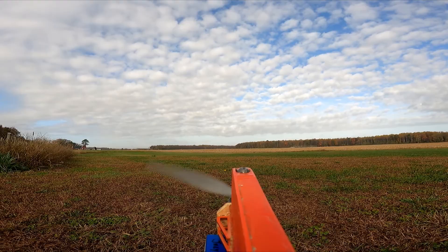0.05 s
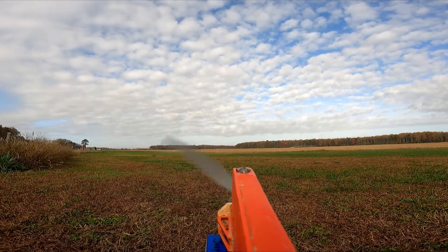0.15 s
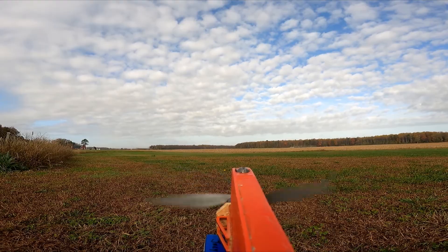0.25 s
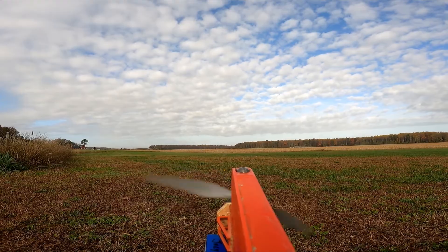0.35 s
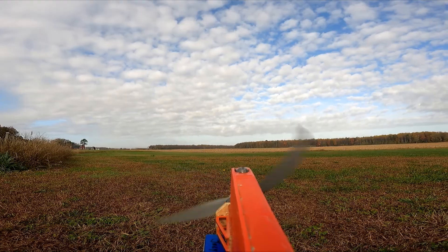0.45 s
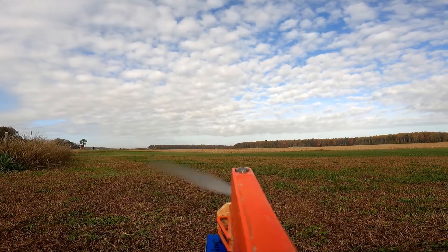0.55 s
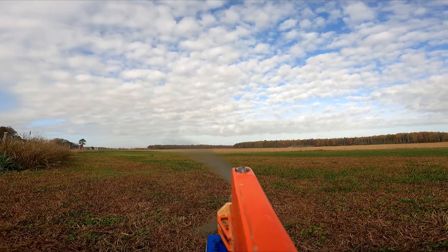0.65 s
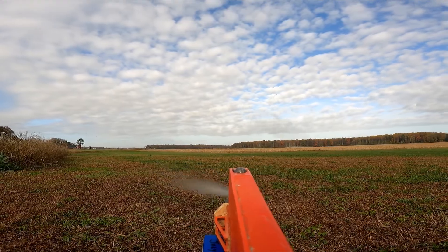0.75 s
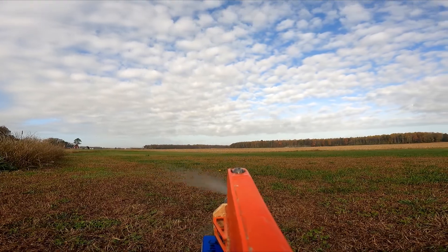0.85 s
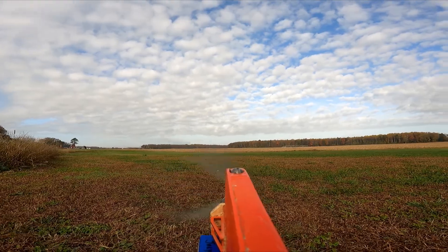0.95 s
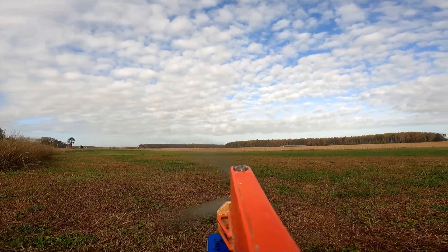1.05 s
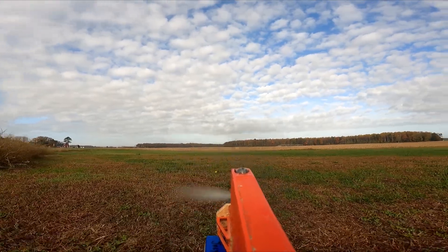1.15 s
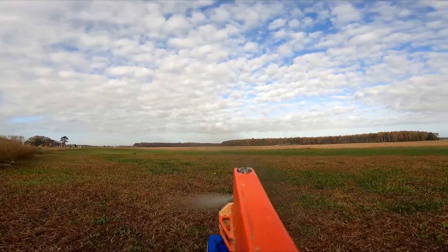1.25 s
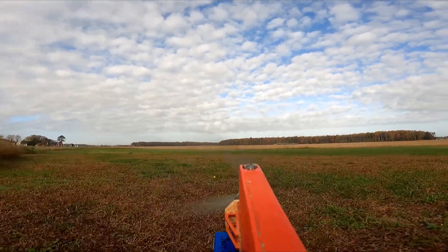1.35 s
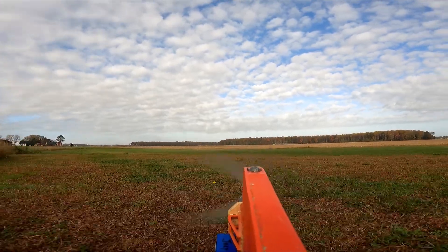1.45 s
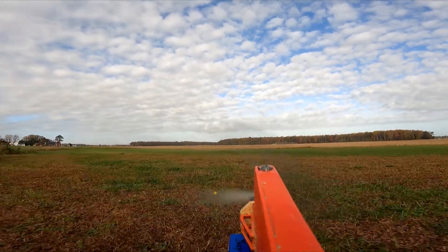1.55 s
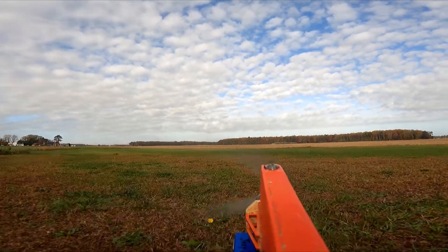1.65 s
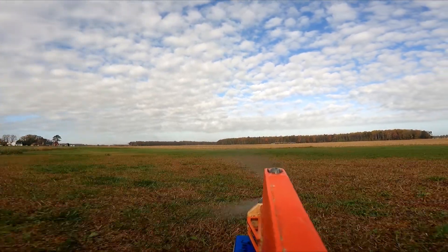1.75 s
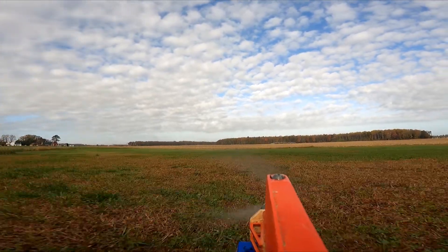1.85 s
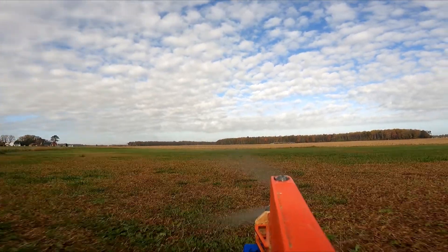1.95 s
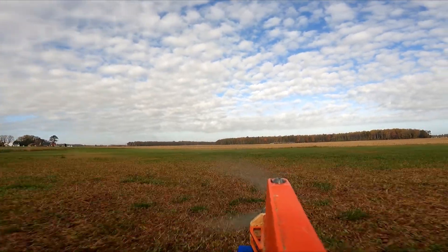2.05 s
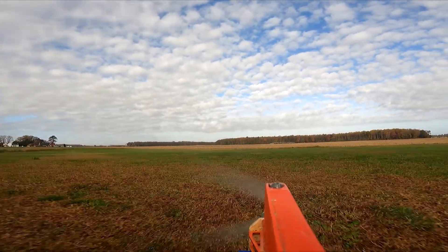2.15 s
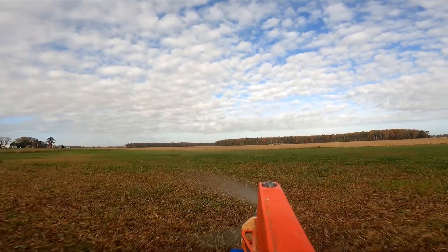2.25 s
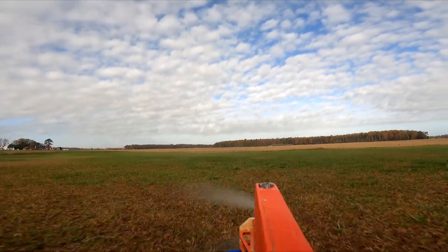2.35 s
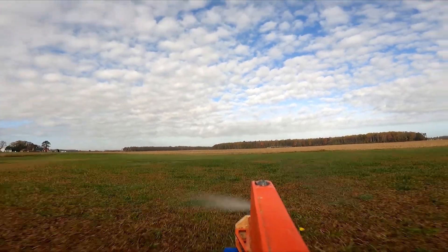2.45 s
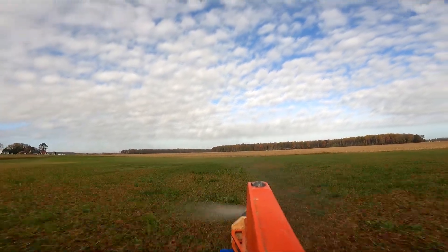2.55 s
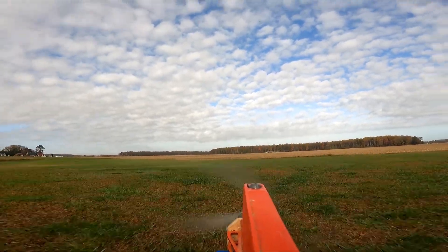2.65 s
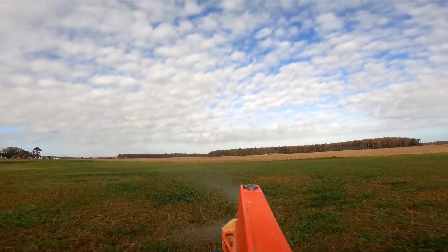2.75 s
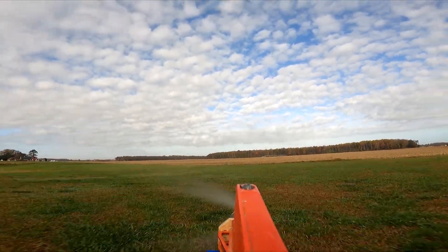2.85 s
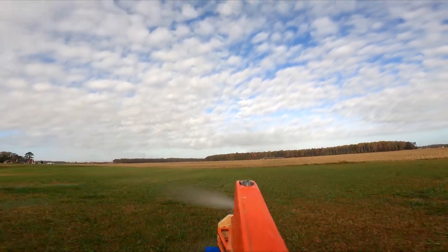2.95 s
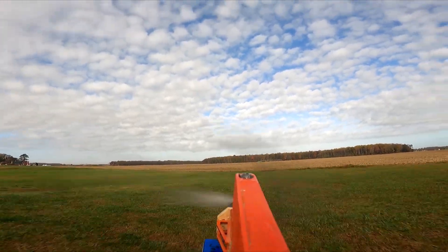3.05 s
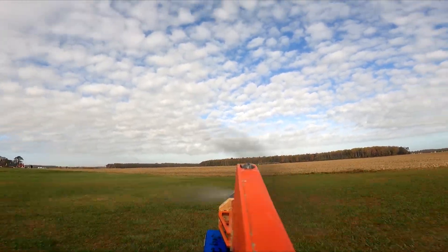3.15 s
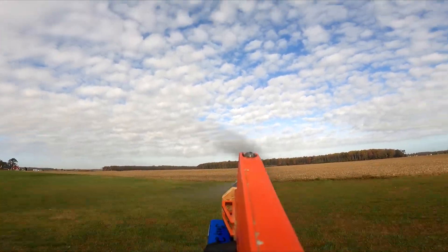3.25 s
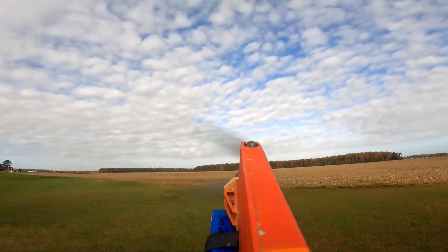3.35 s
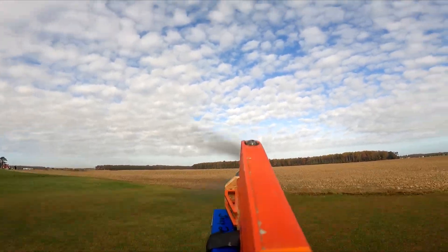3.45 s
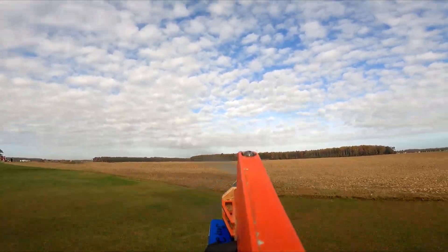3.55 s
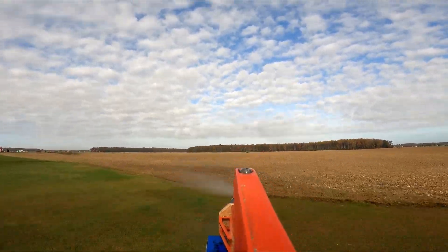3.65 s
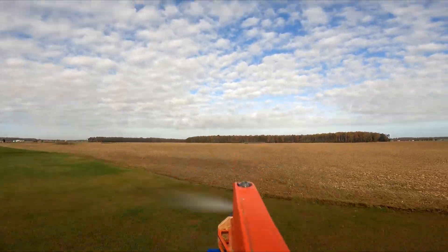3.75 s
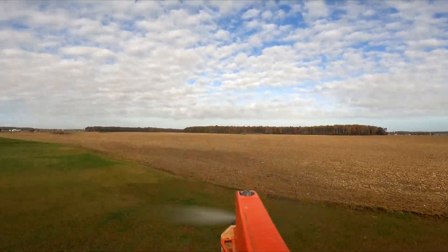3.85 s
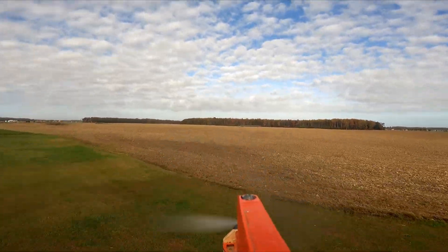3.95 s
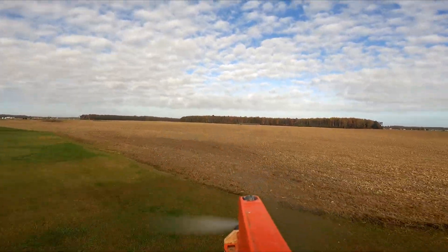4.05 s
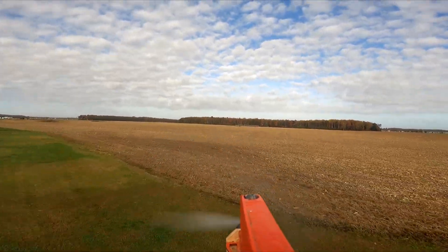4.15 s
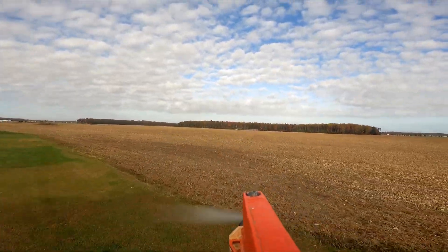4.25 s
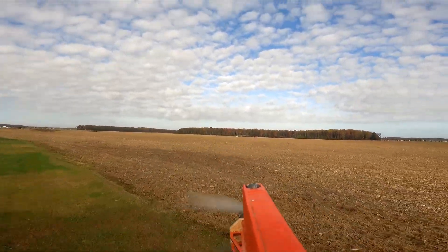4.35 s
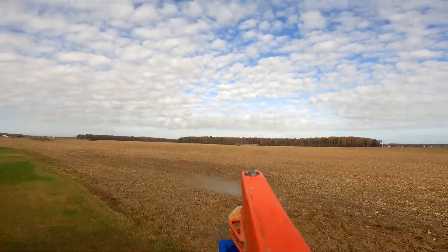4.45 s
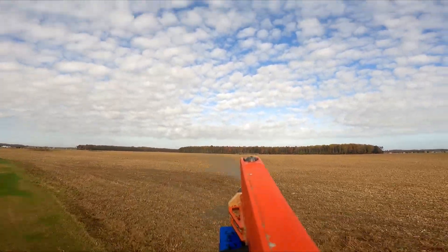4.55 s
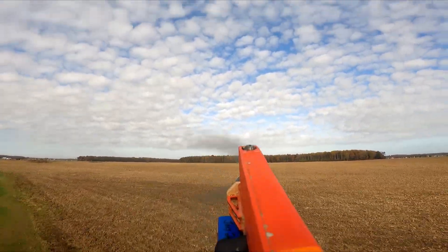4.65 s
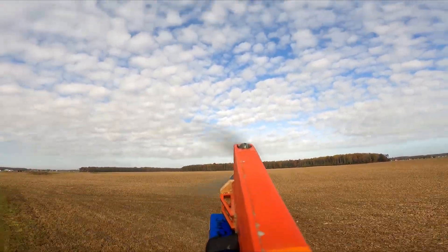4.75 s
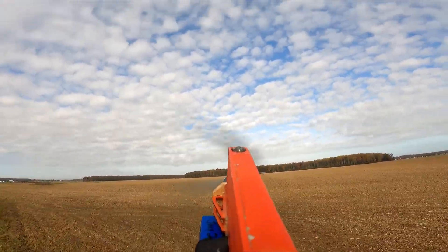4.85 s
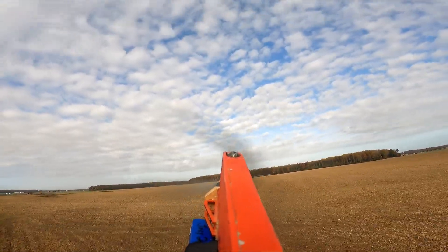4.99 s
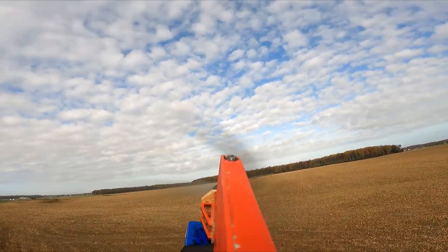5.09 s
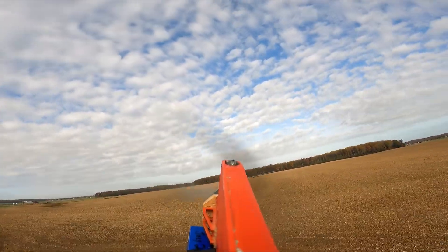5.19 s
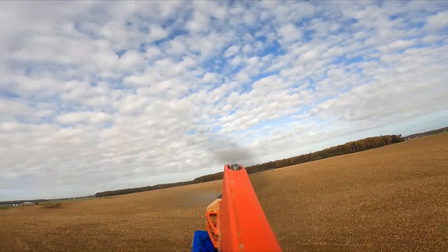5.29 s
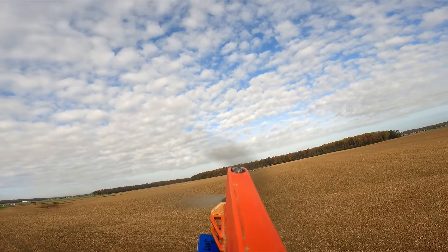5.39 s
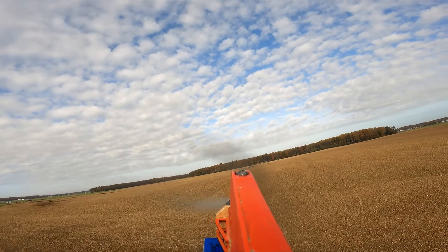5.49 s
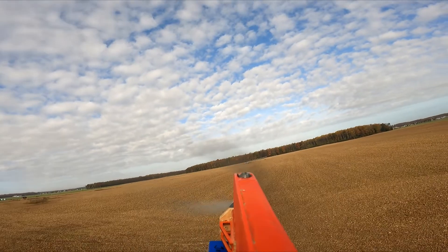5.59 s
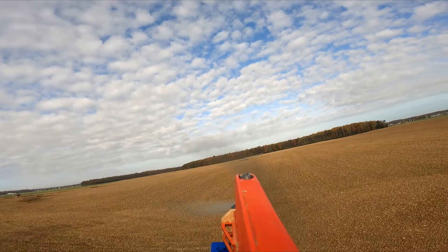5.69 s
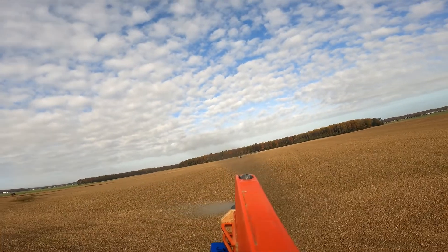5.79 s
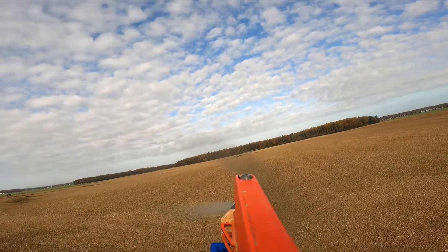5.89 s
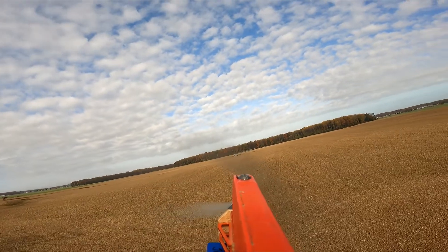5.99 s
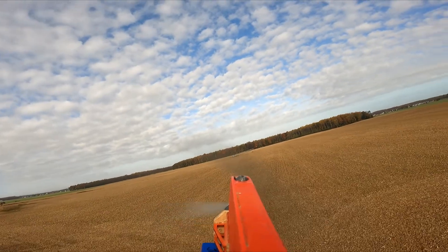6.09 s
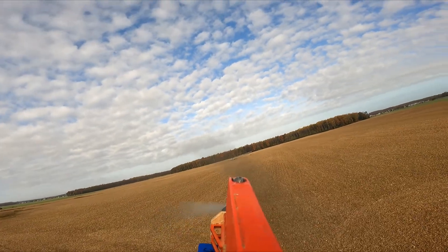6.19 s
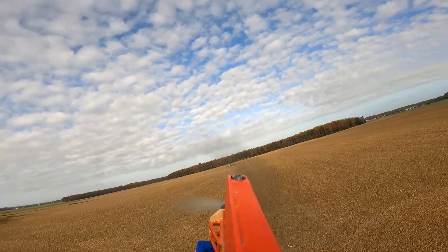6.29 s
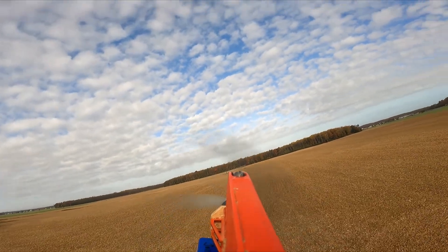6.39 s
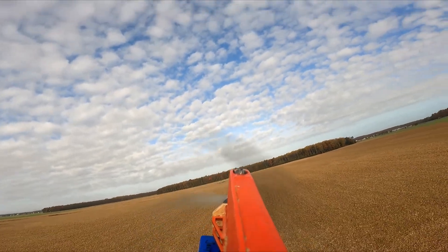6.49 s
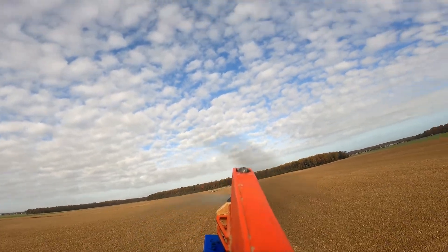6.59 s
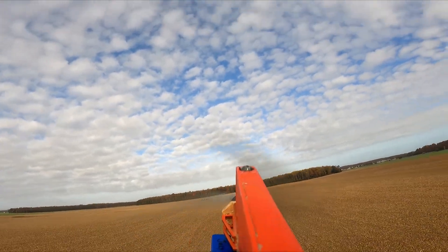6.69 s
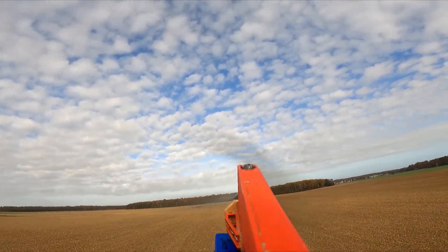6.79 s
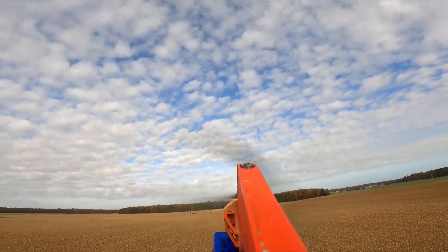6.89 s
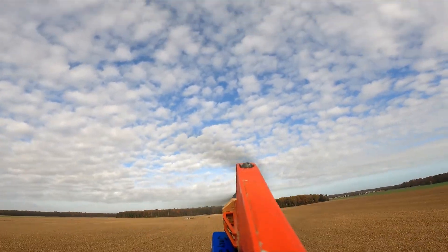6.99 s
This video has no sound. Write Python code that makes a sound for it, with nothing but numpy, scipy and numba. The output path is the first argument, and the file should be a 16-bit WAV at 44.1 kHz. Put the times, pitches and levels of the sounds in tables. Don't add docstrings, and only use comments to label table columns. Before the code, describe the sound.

From a camera fixed to a small electric model plane over an open field: a freewheeling motor slows with a soft hollow whir, then power kicks in at about half a second with a rasping, rising whine. A heavy blast of propeller air crackles on the microphone, then settles into steady buffeting and hiss, with a deep wavering propeller drone that grows and holds at full speed to the end.

```python
import sys
import numpy as np
from scipy import signal
from scipy.fft import rfft, irfft, next_fast_len
from scipy.io import wavfile
from numba import njit

SR = 44100
rng = np.random.default_rng(int(sys.argv[2]) if len(sys.argv) > 2 else 0)


def nominal_scale(level):
    x = np.asarray(level, float) / 20
    return 10 ** x


def unload_wav(signal):
    wavfile.write(
        sys.argv[1],
        SR,
        np.round(np.clip(np.atleast_2d(signal).T, -1, 1) * 32767).astype(np.int16),
    )


N = 310023
T = np.arange(N) / SR
POWER_ON_S, SURGE_S, LIFT_OFF_S = .6, .88, 1.7
FULL_SPEED_HZ = 135


def curves(table):
    s, *columns = np.transpose(table)
    return [np.interp(T, s, c) for c in columns]


def bell(s, length):
    return np.exp(-((T - s) / length) ** 2)


def ramp(s, length):
    return np.clip((T - s) / length, 0, 1)


def shaped(gain):
    size = next_fast_len(N)
    hz = np.arange(size // 2 + 1) * SR / size + 1e-3
    x = irfft(rfft(rng.standard_normal(size)) * gain(hz), size)[:N]
    return x / x.std()


def band(hz, width):
    return shaped(lambda f: np.exp(-.5 * ((f - hz) / width) ** 2))


def walk(rate):
    return shaped(lambda f: 1 / (1 + (f / rate) ** 2))


def resonant(modes):
    def gain(f):
        return np.sqrt(sum(nominal_scale(2 * db) / (1 + (2 * (f - hz) / w) ** 4) for hz, w, db in modes))
    return shaped(gain)


def tone(turns, order, db):
    return np.sqrt(2) * nominal_scale(db) * np.sin(2 * np.pi * order * turns)


# time in seconds, shaft speed in Hz.
SHAFT_SPEED = [(0, 38.3), (.3, 29.5), (.51, 24), (.6, 23.1), (.63, 24.5), (.68, 39), (.71, 49), (.8, 85.5),
               (.835, 96.5), (.88, 104), (1.0, 114), (1.3, 123), (1.6, 125.5), (1.69, 133.6), (2.1, 134.7),
               (3.5, 134.2), (4.3, 135.2), (7.03, 134.9)]


def shaft_speed():
    return curves(SHAFT_SPEED)[0]


# time in seconds, side against mid in dB at 1 kHz, tilt in dB an octave.
STEREO_WIDTH = [
    (0, -6, -0.5),
    (.5, -30.5, 1),
    (1.1, -44, 6.5),
    (1.7, -37.5, 5.5),
    (2.1, -55, 8),
]


def width():
    side_db, tilt_db = curves(STEREO_WIDTH)
    slips_db = sum(12 * bell(s, length=.03) for s in (.8, 1.03, 2.85, 6.35))
    return side_db + slips_db, tilt_db


# time in seconds, gust strength in dB.
GUST_STRENGTH = [(1.0, -30), (1.03, -37), (1.07, -27.5), (1.08, -45.5), (1.74, -50.5), (2.81, -41.5),
                 (2.86, -33), (2.91, -39.5), (3.7, -42.5), (3.74, -56.5), (4.06, -54.5), (4.43, -39),
                 (4.61, -43.5), (5.05, -39.5), (5.72, -48), (6.59, -35), (6.61, -40), (7.03, -42.5)]


def gusts():
    usual_db = -42
    return curves(GUST_STRENGTH)[0] - usual_db


# centre in Hz, steady level in dB,
# then dB per dB of shaft speed, per dB of gust, per dB of airstream.
WASH_LAYERS = [
    (71, -28, -0.05, 0.48, .05),
    (280.8, -24, 1.28, 0.075, 0.34),
    (1600, -19, 0.35, 0.8, .05),
    (7300, -19, 0.47, 0.083, 0.9),
]
# level in dB, rise in seconds, fall in seconds.
THRUST_SURGE = [
    (9.5, 0.059, 1.6),
    (12.5, 0.086, 0.54),
    (2.5, 0.14, 0.35),
    (4, 0.12, 0.18),
]
# time in seconds, level in dB.
AIRSTREAM = [(.2, 2.5), (.45, -8), (.6, 3.5), (.98, 4.5), (1.03, -3), (1.6, -1.5), (2.5, 3), (2.7, -2.5),
             (3.65, -2.5), (3.75, 5.5), (4.4, 3), (4.7, -3.5), (5.3, 3), (5.5, 4), (6.3, 1), (6.6, -1),
             (7.03, 0.5)]


def wash_levels(speed):
    since = T - SURGE_S
    gust_db = gusts() * np.clip(speed / FULL_SPEED_HZ, 0, 1)
    speed_db = 20 * np.log10(speed / FULL_SPEED_HZ)
    stream_db = curves(AIRSTREAM)[0]
    levels = []
    for layer, (surge_db, rise, fall) in zip(WASH_LAYERS, THRUST_SURGE):
        _, db, per_speed, per_gust, per_stream = layer
        steady_db = db + per_speed * speed_db + per_gust * gust_db + per_stream * stream_db
        levels.append(steady_db + surge_db * np.exp(-np.maximum(-since / rise, since / fall)))
    return np.array(levels)


# frequency in Hz, density in dB per Hz.
PORT_COLOUR = [(22, -3.5), (35, -5), (60, 3), (200, 0.5), (330, -3.5), (500, -10), (900, -22),
               (1500, -32.5), (4600, -46.5), (5600, -50.5), (6200, -58), (8000, -59.5), (9600, -58.5),
               (14800, -85.5)]


def wash(levels):
    colour_hz, colour_db = np.transpose(PORT_COLOUR)
    layer_hz = np.transpose(WASH_LAYERS)[0]
    width_db, tilt_db = width()
    spit = walk(78) * (1 + 0.9 * bell(SURGE_S + .05, .17))
    near, mid, side = walk(14), 0, 0

    def density(f):
        return np.interp(np.log(f), np.log(colour_hz), colour_db)

    for hz in 22 * 2 ** np.arange(0, 10, .5):
        def gain(f):
            crossfade = np.cos(np.pi * np.clip(np.log2(f / hz), -.5, .5))
            return nominal_scale(density(f) - density(hz)) * crossfade

        share = np.array([np.interp(np.log(hz), np.log(layer_hz), row) for row in np.eye(4)])
        near = 0.56 * near + 0.87 * walk(8)
        bursts = np.interp(np.log(hz), np.log([200, 600, 2500, 8000]), [0.14, 0.34, 0.64, 0.36])
        db = share @ levels + density(hz) + 10 * np.log10(hz / 200)
        db = db + bursts * (2.2 * spit + 3.0 * near)
        side_db = db + width_db + tilt_db * np.log2(hz / 1000) + 2 * near
        mid = mid + nominal_scale(db) * shaped(gain)
        side = side + nominal_scale(side_db) * shaped(gain)
    return mid, side


# start in seconds, peak in dB, treble against peak in dB.
AIR_PUFFS = [(0.579, -17.5, -34), (0.6718, -11.5, -35), (0.76, -10.5, -26), (.812, -16, -30),
             (0.944, -18, -28), (0.9837, -11, -23), (1.0152, -24, -44), (1.0626, -24, -33),
             (1.15, -18, -29), (1.3415, -20.5, -25), (2.735, -15.5, -35), (2.803, -18.5, -31),
             (2.845, -17, -31), (3.6257, -14, -37), (4.2666, -21, -30), (4.2997, -32, -10),
             (4.68, -21, -30), (5.3528, -48, -10), (5.4396, -15.5, -42), (6.2077, -14, -28),
             (6.573, -13.5, -32)]
# start in seconds, peak in dB.
AIR_SPITS = [(1.2345, -51), (1.3492, -57), (1.4096, -52), (2.311, -50), (2.4108, -45.5), (2.5034, -44),
             (2.8209, -46.5), (3.2209, -48), (3.2773, -44.5), (3.7088, -49.5), (3.824, -45.5),
             (4.2496, -43), (4.385, -46), (5.1228, -40), (5.2014, -50), (5.3571, -40), (5.586, -45),
             (5.9822, -43), (6.072, -42), (6.1233, -45), (6.193, -41), (6.4416, -46.5), (6.727, -47),
             (6.954, -44.5)]


def puffs():
    body, top = np.zeros(N), np.zeros(N)
    for s, db, treble_db in AIR_PUFFS:
        body[int(s * SR)] = nominal_scale(db - 9.0)
        top[int(s * SR)] = nominal_scale(db + treble_db - 4.5)
    for s, db in AIR_SPITS:
        top[int(s * SR)] = nominal_scale(db - 4.5)
    tail = np.arange(2000) / SR
    envelope = np.exp(-tail / 0.0063) * (1 - np.exp(-tail / 0.0016))
    body = signal.fftconvolve(body, envelope)[:N]
    top = signal.fftconvolve(top, envelope)[:N]
    thump = shaped(lambda f: f / (900 + f) / (1 + (f / 1800) ** 2.8) / (1 + (f / 6000) ** 8))
    return body * thump + top * band(hz=7000, width=2200)


# time in seconds, length in seconds, resonance in Hz, level in dB.
SLAP = (1.2, .1, 3900, -62)


def tip_slap(turns):
    when, length, resonance_hz, db = SLAP
    speed_hz = np.interp(when, *np.transpose(SHAFT_SPEED))
    clicks = 0
    for order in range(22, 42, 2):
        detune = (order * speed_hz - resonance_hz) / 700
        clicks = clicks + tone(turns, order, db=db - 6 * detune ** 2 + 3 * walk(15))
    return bell(when, length) * clicks


# frequency in Hz, width in Hz, level in dB.
COGGING_MODES = [(590, 66, -2), (1020, 150, -4.5), (1610, 160, -10)]


def cogging():
    return resonant(COGGING_MODES) * nominal_scale(-40 + 2.5 * walk(30)) * (1 - ramp(POWER_ON_S, .08))


# time
# in seconds, buzz level in dB.
BUZZ_LEVEL = [(0, -41), (.3, -45.5), (.58, -43), (.635, -35.5), (.745, -30.5), (.86, -40.5),
              (1.05, -45), (1.35, -46.5), (2.2, -71.5)]
# frequency in Hz, level in dB.
LOW_ORDER_PATH = [(305, -22), (350, -31), (550, -12), (690, -22), (830, -35), (1110, -31), (1350, -54),
                  (1750, -42)]
HIGH_ORDER_PATH = [(1000, -50), (1500, -36), (2200, -37), (2700, -26), (3300, -27), (4050, -36),
                   (4300, -66), (5280, -45)]


def motor_levels(speed):
    def path(table, order):
        hz, db = np.transpose(table)
        return np.interp(np.log(order * speed), np.log(hz), db)

    buzz_level_db = curves(BUZZ_LEVEL)[0]
    coasting_db = -16 * (1 - ramp(POWER_ON_S, .03))
    eased_db = -8 * ramp(LIFT_OFF_S, .6)
    low_db = path(LOW_ORDER_PATH, order=13) + .5 * (buzz_level_db + 32.5)
    high_db = path(HIGH_ORDER_PATH, order=42) + .35 * (buzz_level_db + 37) + coasting_db
    return low_db + eased_db / 2, high_db + eased_db, buzz_level_db


def magnet_whine(turns, frame_db, pole_db):
    whine = tone(turns + .008 * walk(40), order=13, db=frame_db + 2.5 * walk(40))
    load = ramp(.9, .1)
    smear = np.maximum(load, .55)
    rough = .6 * walk(120) + .8 * load * walk(500) + .4 * walk(300)
    whine += tone(turns, order=42, db=pole_db) * (1 - smear + smear * rough)
    return whine + tone(turns, order=84, db=-40 + 5 * walk(80)) * bell(.668, .025)


# time in seconds, length in seconds, level in dB.
KICK_RINGS = [
    (.63, .015, -36),
    (.676, .01, -31),
]
# time in seconds, length in seconds, level in dB.
STRAIN_GRIND = (0.69, .11, -36)


def frame_strain():
    kicks = sum(nominal_scale(db) * bell(s, length) for s, length, db in KICK_RINGS)
    grind_s, grind_length, grind_db = STRAIN_GRIND
    grind = band(hz=2780, width=640) * nominal_scale(grind_db + 3.9 * walk(70))
    return band(hz=3350, width=39) * kicks + grind * bell(grind_s, grind_length)


# frequency in Hz, width in Hz, level in dB.
FRAME_MODES = [(575, 70, 7), (1000, 200, 4), (1600, 300, -3), (2600, 1000, -5), (3250, 500, -3)]
CASE_MODES = [(4040, 2500, -13), (5700, 1100, -15), (8760, 2400, -22.5), (11200, 1200, -31.5),
              (13200, 900, -47)]


def winding_buzz(buzz_db):
    case_gain = nominal_scale(2 * (buzz_db + 35) - 17)
    buzz = resonant(FRAME_MODES) + case_gain * resonant(CASE_MODES)
    return nominal_scale(2 * walk(30)) * nominal_scale(buzz_db) * buzz


# start in seconds, end in seconds, level in dB.
SWITCHING = [
    (0.588, .82, -54),
    (1.53, 1.68, -49),
]


def chopper(turns):
    level = sum(nominal_scale(db) * np.clip(np.minimum((T - a) / .005, (b - T) / 0.25), 0, 1)
                for a, b, db in SWITCHING)
    pulsing = 1 + .4 * np.sin(2 * np.pi * 14 * turns)
    return level * nominal_scale(2 * walk(30)) * np.sin(2 * np.pi * 8010 * T) * pulsing


def motor(turns, frame_db, pole_db, buzz_db):
    whine = magnet_whine(turns, frame_db, pole_db) + cogging() + frame_strain()
    return whine + winding_buzz(buzz_db) + chopper(turns)


# time in seconds, shaft tone in dB, blade tone in dB.
PROPELLER_TONES = [(.8, -48, -58), (.93, -11.5, -61), (1.18, -21, -53), (1.36, -11, -39),
                   (1.72, -13.5, -26.5), (1.95, -14.5, -18.5), (2.05, -23, -28.5), (2.22, -9.5, -18.5),
                   (2.5, -18, -19.5), (2.8, -29.5, -19), (3.1, -20.5, -14.5), (3.6, -32.5, -13.5),
                   (4.0, -29.5, -10.5), (4.3, -24.5, -12), (5.0, -22.5, -15), (5.6, -31, -12.5),
                   (6.3, -28.5, -16), (7.03, -19, -11.5)]
# time in seconds, length in seconds, extra flutter in dB.
MOUNT_SHUDDERS = [(2.308, 0.073, 10), (2.808, 0.2, 11.5), (3.1, 0.13, 11), (3.553, 0.22, 13.5),
                  (4.55, 0.19, 5), (4.966, .08, 10), (6.163, 0.044, 9.5), (6.68, .1, 8.5)]


def propeller(turns):
    shaft_db, blade_db = curves(PROPELLER_TONES)
    flutter_db = -26 + .5 * (blade_db + 14.5) + 2.5 * walk(2.2)
    flutter_db += sum(db * bell(s, length) for s, length, db in MOUNT_SHUDDERS)
    above = signal.hilbert(band(hz=39.6, width=12.6))
    below = signal.hilbert(band(hz=31.8, width=12)).conj()
    shake = above + 0.65 * below
    flutter = nominal_scale(flutter_db - 4) * (shake * np.exp(4j * np.pi * turns)).real
    sway = turns + 0.078 * np.clip(nominal_scale(flutter_db - blade_db), 0, 1) * walk(7.8)
    blades = tone(sway, order=2, db=blade_db + 2.6 * walk(26))
    blades += tone(sway, order=4, db=blade_db - 24.0 + 2.0 * walk(4.2))
    unbalance = tone(turns + 0.12 * walk(5.0), order=1, db=shaft_db - 1.0 + 0.37 * walk(24))
    return unbalance + blades + flutter


def scene():
    speed = shaft_speed()
    turns = np.cumsum(speed) / SR
    mid, side = wash(wash_levels(speed))
    hum = motor(turns, *motor_levels(speed))
    side = side + (hum - np.roll(hum, shift=3)) * nominal_scale(width()[0] - 5.5)
    mid = mid + puffs() + tip_slap(turns) + hum + propeller(turns)
    return np.array([mid + side, mid - side])


@njit
def limiter(x, top, attack, release):
    gain, level = np.empty(len(x)), 0.
    for i in range(len(x)):
        level += (x[i] - level) * (attack if x[i] > level else release)
        gain[i] = top / max(level, top)
    return gain


def roll_off(x):
    return signal.sosfilt(signal.butter(12, 14950, fs=SR, output="sos"), x)


def record(dry):
    held = dry * limiter(np.abs(dry).max(axis=0), 0.42, 0.005, 0.00049)
    mix = 0.71 * np.tanh(held / 0.75)
    return roll_off(mix)


dry = scene()
out = record(dry)
unload_wav(out)
```